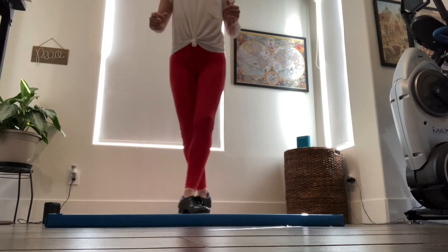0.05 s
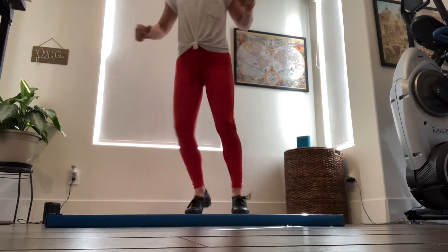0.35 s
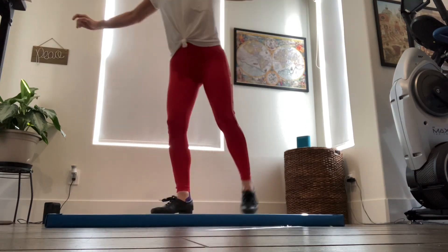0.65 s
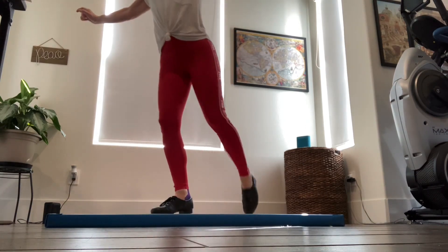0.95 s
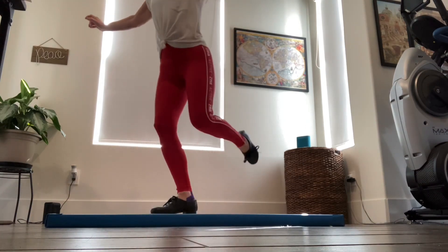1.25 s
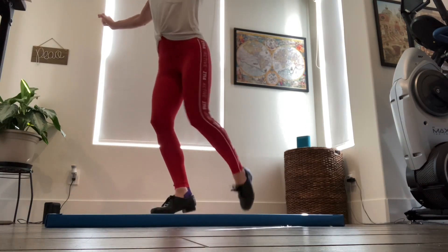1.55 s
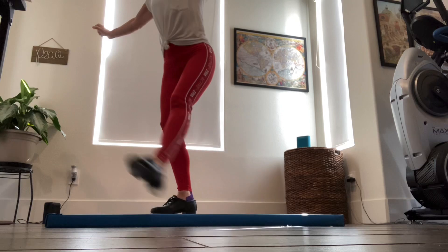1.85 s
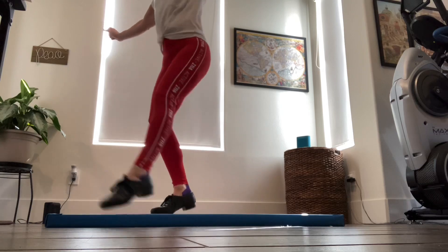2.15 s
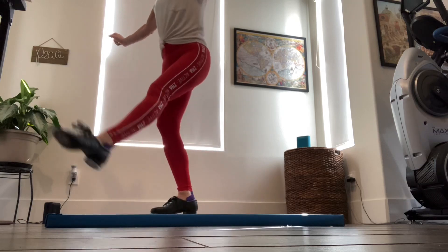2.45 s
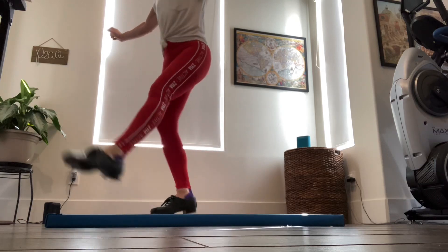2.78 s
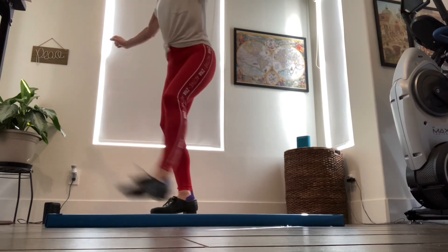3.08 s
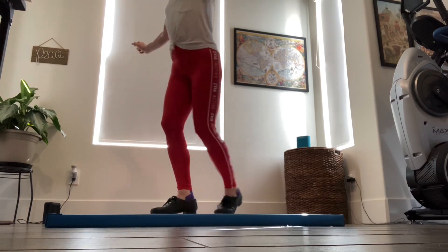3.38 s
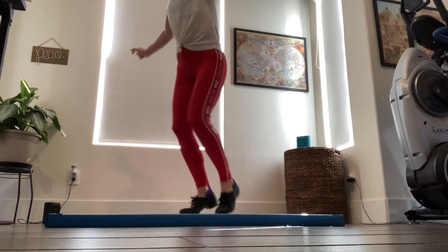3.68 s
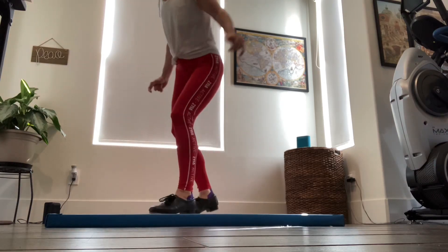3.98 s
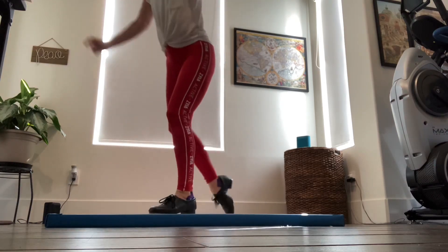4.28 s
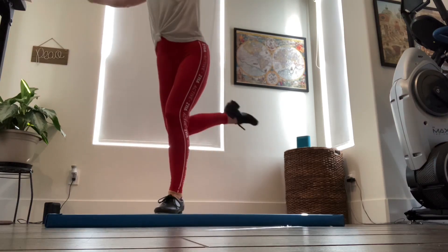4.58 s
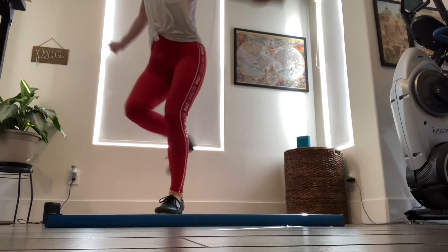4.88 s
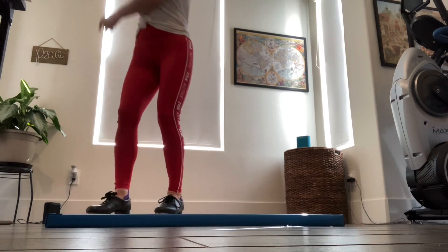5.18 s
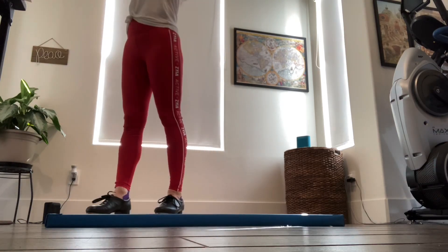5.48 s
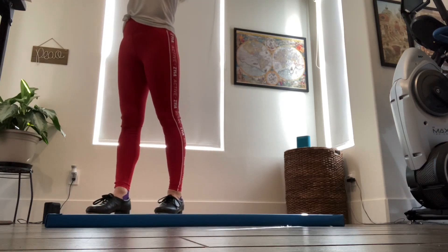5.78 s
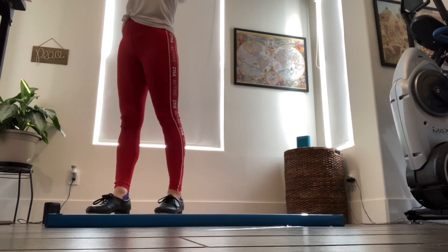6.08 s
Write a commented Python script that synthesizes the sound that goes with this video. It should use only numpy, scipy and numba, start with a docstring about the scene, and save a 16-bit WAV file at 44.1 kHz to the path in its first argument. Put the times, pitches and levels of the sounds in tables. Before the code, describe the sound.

Tap shoes dance on a raised wooden board in a bare, lively room. Bright, rattling toe taps mix with hollow knocks from the ball of the foot and short, deep heel thuds, about three strikes a second, while the floor booms below. One loud, flat stamp ends the run, and its echo fades into a faint low room rumble. It is heard in stereo from a microphone on the floor in front.

```python
"""Tap shoes on a raised board

Toe taps, ball drops and heel drops ring a wooden board and the shoes' metal plates; the floor booms below.
The room is bare and lively, heard through the two mics of a phone on the floor in front.
A last flat stamp drives the phone's limiter down, and the room's tail swells as it lets go."""
import sys
import numpy as np
from scipy import signal
from scipy.fft import rfft, irfft
from scipy.io import wavfile
from scipy.ndimage import uniform_filter1d
from numba import njit

SR = 44100
rng = np.random.default_rng(int(sys.argv[2]) if len(sys.argv) > 2 else 0)


def unload_wav(signal):
    """Save mono or channel-first audio to the path in sys.argv[1] as 16-bit WAV at rate SR, clipped to [-1, 1]."""
    wavfile.write(
        sys.argv[1],
        SR,
        np.round(np.clip(np.atleast_2d(signal).T, -1, 1) * 32767).astype(np.int16),
    )


N = 279594

# toe taps: start_s, strength_db, boom_db, tilt_db_per_octave, thump_hz, clack_hz
TOE_TAPS = [(0.2301, -24.5, -11.5, -0.93, 290, 2540), (1.9382, -24, -26.5, -0.07, 258, 2310),
            (2.4917, -25.5, -19, 0.57, 300, 2800), (3.0338, -23, -35.5, -0.1, 348.4, 3100),
            (3.2768, -24.5, -11.5, -2.24, 240, 2560), (3.5655, -27, -7, -0.28, 280, 2600)]
# ball drops: start_s, strength_db, boom_db, tilt_db_per_octave, thump_hz, knock_hz, clack_hz, hollowness
BALL_DROPS = [(0.458, -19.5, -6, 0.5, 313, 900, 3430, 2.23),
              (1.0348, -31.5, -12, -0.7, 299, 1270, 2210, 1.25),
              (1.5759, -33.5, -0.5, -0.1, 255, 1150, 2670, .8),
              (2.1553, -34, -8.5, -.9, 290, 950, 1750, 0.93), (2.7153, -37.5, -8.5, 0.1, 290, 960, 1728, 1),
              (3.8155, -16.5, -15, 0.1, 335, 650, 4735, 0.78),
              (4.3918, -27.5, -5.5, 1, 330, 880, 3630, 0.77)]
# heel drops: start_s, strength_db
HEEL_DROPS = [(0.8086, -25.5), (1.3668, -26.5), (4.1868, -25.5)]
# the closing stamp: start_s, strength_db
STAMP = (4.951, -8.5)
# a plate slaps down again just after a strike: start_s, level_db (against the first contact)
SLAPS = [(1.5819, -2.5), (1.9572, 5.5), (2.162, -4), (2.51, -4), (2.7226, 3.5), (3.285, -8), (3.828, 1),
         (4.962, 9)]
# modes of the board on its floor: pitch_hz, level_db, base_t60_s
BOARD_MODES = [(61.3, -14.5, 0.79), (76.2, -10.5, 0.46), (107, -14.5, 0.74), (136.3, -4.5, 0.13),
               (179, -3.5, 0.15), (252, -1, 0.074), (298, -7, 0.061), (422, 2, .085), (490, -1.5, 0.09),
               (534, -1.5, .07), (658, -1, 0.094), (781, 4, 0.034), (998, 2, 0.072), (1103, -0.5, 0.053),
               (1378, 6, 0.045)]
# modes of the metal plate on the sole: pitch_hz, level_db, base_t60_s
PLATE_MODES = [(1840, 4.5, 0.029), (2207, 8, 0.027), (2505, -11.5, 0.2), (2530, 0.5, 0.052),
               (2760, -3, 0.014), (3010, 2, 0.033), (3580, -8, 0.043), (3652, -28, .05), (4013, -8, 0.021),
               (4570, -9.5, 0.13), (4542, -26, 0.046), (8454, -33, .06), (9560, -8.5, 0.077)]
# tone of the crack as heard, with a narrow dip near 11.6 kHz: frequency_hz, level_db
CRACK_EQ = [(50, -5.5), (250, 3), (600, 0), (1100, -6), (1500, 2), (2500, -2.5), (3900, -3), (5100, -6),
            (6400, -7.5), (8700, -7.5), (10200, -13), (11600, -25.5), (14000, -13), (16000, -25)]
# the five registers, boom, thump, knock, clack and tick: low_hz, high_hz
REGISTERS = [(45, 105), (105, 560), (560, 1500), (1500, 4200), (4200, 15500)]
# what each part of the shoe excites, against the blow's strength: thump_db, knock_db, clack_db, tick_db
TOE_VOICE = (3, -3, 5, -5)
BALL_VOICE = (9, 7, -1, -13.5)
HEEL_VOICE = (13.5, 3.5, 2.23, -16.5)
STAMP_VOICE = (7.5, 5, -2, -8.5)
# the regions that heel and flat sole favour: thump_hz, knock_hz, clack_hz
HEEL_FOCUS = (270, 616, 1830)
STAMP_FOCUS = (352, 700, 3460)
# half-widths of the favoured regions: thump_octaves, knock_octaves, clack_octaves
FOCUS_WIDTHS = (.58, .3, .36)
# the room's decay: frequency_hz, t60_s
ROOM_DECAY = [(60, .6), (150, 0.51), (400, 0.54), (1000, 0.53), (3000, 0.6), (5000, .54), (9000, 0.39),
              (15000, 0.2)]
# how alike left and right are: frequency_hz, likeness (0-1)
STEREO_LIKENESS = [(60, 0.95), (130, 0.86), (290, 0.7), (700, 0), (3000, 0), (7000, 0.5), (14000, 1)]
# tone of the still room: frequency_hz, relative_db
ROOM_TONE_EQ = [(15, -49), (25, -13.5), (38, -15.5), (64, -4.5), (103, -16), (252, -18.5), (488, -23.5),
                (536, -26), (900, -27), (1250, -37.5), (7000, -58.5), (9100, -93.5), (15400, -120)]

RING, TAIL, LEAD = 2 ** 14, 2 ** 15, 1024  # samples: a strike, its reverb, the run-up to its landing
TOP_HZ = 16000


def toe_tap(row):
    """The loose toe plate is flicked against the board: bright and rattling."""
    start, strength_db, boom_db, tilt_db, thump_hz, clack_hz = row
    levels = register_levels(TOE_VOICE, strength_db, boom_db, tilt_db)
    return strike(start, levels, focus_hz=(thump_hz, 1100, clack_hz), focus_db=(4.5, 1, 5),
                  board_ring=.38, plate_ring=.89, dull_db=.5, travel_s=.0012,
                  crack_db=-3.15, crack_s=.00041, chatter_db=-6, chatter_s=.006, lead_in_db=-9,
                  boom_room_db=12, low_room_db=2, high_room_db=5, pan_db=-2.5)


def ball_drop(row, usual_db=-31.5):
    """The ball of the foot lands with weight and lets the board ring: a hollow knock, brighter if hard."""
    start, strength_db, boom_db, tilt_db, thump_hz, knock_hz, clack_hz, hollow = row
    harder_db = strength_db - usual_db
    levels = register_levels(BALL_VOICE, strength_db, boom_db, tilt_db + .11 * harder_db)
    focus_db = hollow * np.array([4.5, 5, 4.5])
    return strike(start, levels, focus_hz=(thump_hz, knock_hz, clack_hz), focus_db=focus_db,
                  board_ring=1.1, plate_ring=.47, dull_db=4.5 - .3 * harder_db, travel_s=.0008,
                  crack_db=-5.5, crack_s=.00057, chatter_db=0, chatter_s=.0014, lead_in_db=-11.5,
                  boom_room_db=4, low_room_db=-2, high_room_db=-5, pan_db=-1.15)


def heel_drop(row):
    """The heel comes down hard and stays, damping the board: a short, deep thud."""
    start, strength_db = row
    levels = register_levels(HEEL_VOICE, strength_db, boom_db=-13)
    return strike(start, levels, focus_hz=HEEL_FOCUS, focus_db=(4, 3.5, 12),
                  board_ring=.48, plate_ring=.1708, dull_db=2.6, travel_s=.00011,
                  crack_db=-14, crack_s=.0012, chatter_db=-18.5, chatter_s=.0016, lead_in_db=-6,
                  boom_room_db=-12, low_room_db=-2, high_room_db=1.8, pan_db=-2.5)


def stamp(row):
    """The whole sole slams down with a big crack."""
    start, strength_db = row
    levels = register_levels(STAMP_VOICE, strength_db, boom_db=-19.5)
    return strike(start, levels, focus_hz=STAMP_FOCUS, focus_db=(5, 2, 4),
                  board_ring=.45, plate_ring=.7, dull_db=.5, travel_s=.0027,
                  crack_db=-1.3, crack_s=.0017, chatter_db=-4.5, chatter_s=.004, lead_in_db=-20,
                  boom_room_db=0, low_room_db=-1, high_room_db=1.5, pan_db=-1.5)


def strike(start, levels, focus_hz, focus_db, board_ring, plate_ring, dull_db, travel_s,
           crack_db, crack_s, chatter_db, chatter_s, lead_in_db,
           boom_room_db, low_room_db, high_room_db, pan_db):
    """One blow: board and plate ring, the contact cracks, the room answers from that spot."""
    t, hz = np.arange(RING) / SR, np.maximum(bins(RING), 1)
    burst = rng.standard_normal(RING) * np.exp(-t / crack_s)
    crack = eq(burst, curve(CRACK_EQ, hz) - smooth_spectrum(burst)[::2])  # grainy, yet even in tone
    swing = 1 - np.exp(-t / .0012)  # the board takes a moment to reach its full swing
    ringing = swing * ring(BOARD_MODES, board_ring) + ring(PLATE_MODES, plate_ring)
    body = normalise(ringing) + undb(crack_db) * normalise(crack)
    rattle = signal.fftconvolve(body, chatter(start, chatter_s, chatter_db))[:RING]
    body = body + band(rattle, 1400, TOP_HZ)  # the heavy board does not follow the plate's chatter
    # the part of the shoe that lands favours two regions of the board's modes and one of the plate's
    focus = sum(db * np.exp(-(np.log2(hz / centre) / width) ** 2)
                for db, centre, width in zip(focus_db, focus_hz, FOCUS_WIDTHS))
    softness = dull_db * np.log2(np.maximum(hz / 2500, 1))  # a soft landing loses treble by the octave
    body = balance(eq(body, focus - softness), levels)
    # reverb against direct sound
    room_db = curve([(70, boom_room_db), (220, low_room_db), (450, low_room_db),
                     (1100, 1), (2300, high_room_db), (5000, 5.5)], bins(TAIL))
    direct = mic_pair(np.pad(body, (LEAD, TAIL - RING - LEAD)))
    reverb = eq(room_response(), smooth_spectrum(body) + room_db)
    reverb = np.pad(reverb, ((0, 0), (LEAD, 0)))[:, :TAIL]
    heard = bending_waves(direct + reverb, travel_s) + lead_in(body, lead_in_db)
    # left minus right: the boom leans left
    lean_db = curve([(80, 6), (160, .5), (500, .5), (1100, pan_db), (3500, pan_db), (8000, .5)],
                    bins(TAIL))
    share_db = -10 * np.log10(1 + undb(2 * room_db))  # direct sound and room share the blow's energy
    return np.array([eq(mic, share_db + side * lean_db / 2) for mic, side in zip(heard, (1, -1))])


def ring(modes, decay_stretch, spread_db=1.45):
    """Decaying modes; every spot on the board and the sole weights and detunes them a little."""
    hz, db, t60 = np.transpose(modes)[:, :, None]
    weight, detune = rng.standard_normal((2, len(modes), 1))
    t = np.arange(RING) / SR
    polarity = (-1) ** np.arange(len(modes))[:, None]
    decay = np.exp(-np.log(1000) * t / (t60 * decay_stretch))
    tones = np.sin(2 * np.pi * hz * (1 + .013 * detune) * t)
    return np.sum(polarity * undb(db + spread_db * weight) * decay * tones, axis=0)


def chatter(start, chatter_s, chatter_db):
    """Force after the first touch: a brief rattle as the plate settles, and any second slap."""
    t = np.arange(RING) / SR
    grains = rng.standard_normal(RING) ** 3 * np.exp(-t / chatter_s)
    force = undb(chatter_db) * grains / np.sqrt(np.sum(grains ** 2))
    for slap_s, db in SLAPS:
        if 0 < slap_s - start < .1:
            force[int((slap_s - start) * SR)] += undb(db)
    return force


def lead_in(body, lead_in_db, rise_s=.003):
    """A faint noise swells for an instant before each strike."""
    t = (np.arange(RING) - LEAD) / SR
    swell = rng.standard_normal(RING) * np.exp(-np.abs(t) / rise_s) * (t < 0)
    swell = np.pad(swell / np.sqrt(np.sum(swell ** 2)), (0, TAIL - RING))
    return undb(lead_in_db) * band(eq(swell, smooth_spectrum(body)), 530, 6000)


def bending_waves(x, travel_s, reference_hz=1000):
    """Bending waves in the board run slower at low pitch, so the thump trails the click."""
    size = x.shape[-1]
    lag_cycles = 2 * travel_s * np.sqrt(bins(size) * reference_hz)  # travel_s holds at reference_hz
    return irfft(rfft(x) * np.exp(-2j * np.pi * lag_cycles), size)


def register_levels(voice, strength_db, boom_db, tilt_db=0, pivot_hz=1510):
    """Levels from boom to tick: the shoe part's voice, raised by strength and tilted per octave."""
    octaves = np.log2(np.sqrt(np.prod(REGISTERS[1:], axis=1)) / pivot_hz)
    return strength_db + np.append(boom_db, np.array(voice) + tilt_db * octaves)


def balance(x, levels):
    """Shape a blow smoothly until each register carries its level."""
    hz, centres = bins(RING), np.sqrt(np.prod(REGISTERS, axis=1))
    power = 2 * np.abs(rfft(x)) ** 2 / RING / (SR / 10)
    gain_db = np.zeros(len(REGISTERS))
    for _ in REGISTERS:
        shaped = power * undb(2 * curve(list(zip(centres, gain_db)), hz))
        register_power = [shaped[(hz >= lo) & (hz < hi)].sum() for lo, hi in REGISTERS]
        gain_db = gain_db + levels - 10 * np.log10(register_power)
    return eq(x, curve(list(zip(centres, gain_db)), hz))


def mic_pair(x, wander_s=.0002):
    """Direct sound at the two mics; the lag between them scatters as the feet move about."""
    lag_s = wander_s * rng.standard_normal() * np.array([[-.5], [.5]])
    return irfft(rfft(x) * np.exp(-2j * np.pi * bins(len(x)) * lag_s), len(x))


def room_response(build_s=.0018, early_db=4, early_s=.014):
    """The room's answer at unit gain: a few strong early reflections melt into a tail."""
    t, spectrum, tail = np.arange(TAIL) / SR, stereo_noise(TAIL), 0
    for k, (_, t60) in enumerate(ROOM_DECAY):
        crossover = curve([(hz, j == k) for j, (hz, _) in enumerate(ROOM_DECAY)], bins(TAIL))
        tail = tail + irfft(spectrum * crossover, TAIL) * np.exp(-np.log(1000) * t / t60)
    reflections = undb(early_db * np.exp(-t / early_s) * rng.standard_normal(TAIL))
    reflections /= np.sqrt(uniform_filter1d(reflections ** 2, size=256))
    build_up = 1 - np.exp(-(t / build_s) ** 2)
    tail = tail * reflections * build_up
    tone_db = (smooth_spectrum(tail[0], blur=.64) + smooth_spectrum(tail[1], blur=.31)) / 2
    return eq(tail, -tone_db)


def room_tone(level_db=-64):
    """The low rumble of a quiet house."""
    rumble = irfft(stereo_noise(N) * undb(curve(ROOM_TONE_EQ, bins(N))), N)
    return undb(level_db) * rumble / np.std(rumble.mean(axis=0))


def stereo_noise(size):
    """Spectrum of stereo noise: wide in the middle, nearly mono in the bass and top treble."""
    mid, side = rfft(rng.standard_normal((2, size)))
    alike = np.clip(curve(STEREO_LIKENESS, bins(size)), 0, .99)
    return mid * np.sqrt(1 + alike) + side * np.sqrt(1 - alike) * np.array([[1], [-1]])


def smooth_spectrum(x, blur=.1):
    """Spectrum in dB with its narrow dips filled in, as when a blow is heard from all directions."""
    power = np.abs(rfft(x, TAIL)) ** 2
    k = np.arange(len(power))
    lo = np.maximum(k * (1 - blur) - 6, 0).astype(int)
    hi = np.minimum(k * (1 + blur) + 6, len(k)).astype(int)
    power_above = np.append(np.cumsum(power[::-1])[::-1], 0)
    return 10 * np.log10(np.maximum((power_above[lo] - power_above[hi]) / (hi - lo), 1e-12))


def eq(x, db):
    """Minimum-phase EQ with the given gain at each frequency."""
    size = x.shape[-1]
    cepstrum = irfft(np.log(undb(db)), size)
    cepstrum[1:size // 2] *= 2
    cepstrum[size // 2 + 1:] = 0
    return irfft(rfft(x) * np.exp(rfft(cepstrum)), size)


def band(x, lo_hz, hi_hz):
    """Band-pass."""
    return signal.sosfilt(signal.butter(4, [lo_hz, hi_hz], "band", fs=SR, output="sos"), x + 1e-18)


def curve(points, hz):
    """Read (frequency_hz, value) breakpoints on a log-frequency axis."""
    point_hz, value = np.transpose(points)
    return np.interp(np.log(np.maximum(hz, 1)), np.log(np.maximum(point_hz, 1)), value)


def bins(size):
    """Frequencies of a spectrum of this many samples."""
    return np.arange(size // 2 + 1) * SR / size


def normalise(x):
    """Scale a burst so that its energy, spread over a tenth of a second, has rms 1."""
    return x / np.sqrt(np.mean(np.sum(x ** 2, axis=-1)) / (SR / 10))


def undb(db):
    """Decibels to gain."""
    return 10 ** (np.asarray(db) / 20)


def place(out, start, sound):
    """Lay a strike into the mix so that it lands at the given time."""
    i = int(start * SR) - LEAD
    piece = sound[:, max(-i, 0):N - i]
    out[:, max(i, 0):max(i, 0) + piece.shape[1]] += piece


def scene(edge_lead_s=.011, edge_db=-19, mic_lag_s=.000225):
    """The whole dance over the room tone, with the right mic a touch behind the left."""
    out = np.zeros((2, N))
    place(out, -.1, toe_tap(TOE_TAPS[0]))  # a toe tap is still ringing at the start
    steps = (toe_tap, TOE_TAPS), (ball_drop, BALL_DROPS), (heel_drop, HEEL_DROPS), (stamp, [STAMP])
    for step, cues in steps:
        for row in cues:
            place(out, row[0], step(row))
    # the edge of the stamping sole touches just before the rest
    place(out, STAMP[0] - edge_lead_s, undb(edge_db) * band(stamp(STAMP), 870, 2000))
    lag = int(round(mic_lag_s * SR))
    out[1] = np.pad(out[1], (lag, 0))[:N]
    return out + room_tone()


@njit
def limiter_cut(over_db, hold_samples, release_db_per_sample):
    """Gain reduction in dB: grabs any excess at once, holds, then lets go steadily."""
    cut_db, now_db, wait = np.zeros(len(over_db)), 0., 0.
    for i in range(len(over_db)):
        wait -= 1
        if over_db[i] > now_db:
            now_db, wait = over_db[i], hold_samples
        elif wait < 0:
            now_db = max(now_db - release_db_per_sample, 0.)
        cut_db[i] = now_db
    return cut_db


def record(dry, ceiling_db=-3, hold_s=.17, release_db_per_s=95):
    """The phone's limiter looks ahead and holds; remaining peaks are rounded and the top is cut."""
    power = uniform_filter1d(np.max(dry ** 2, axis=0), size=128)
    over_db = 10 * np.log10(np.maximum(power, 1e-12)) - ceiling_db
    cut_db = limiter_cut(over_db, float(hold_s * SR), float(release_db_per_s / SR))
    limited = dry * undb(-uniform_filter1d(cut_db, size=256))
    rounded = limited / (1 + (limited / .95) ** 8) ** (1 / 8)
    return signal.sosfilt(signal.ellip(8, .2, 70, TOP_HZ, fs=SR, output="sos"), rounded)


dry = scene()
out = record(dry)
unload_wav(out)
```